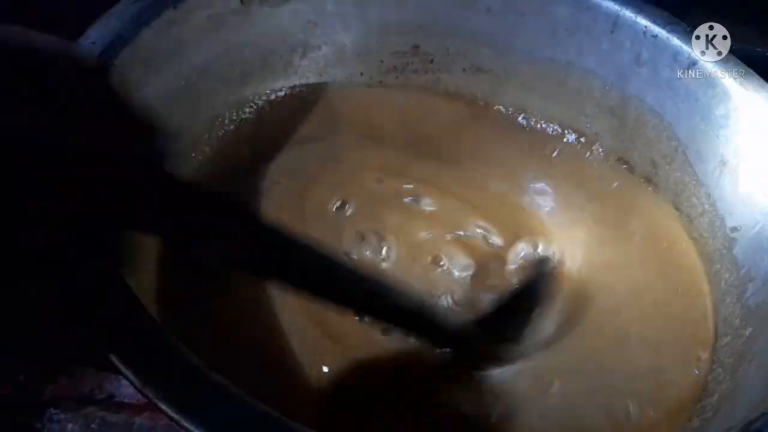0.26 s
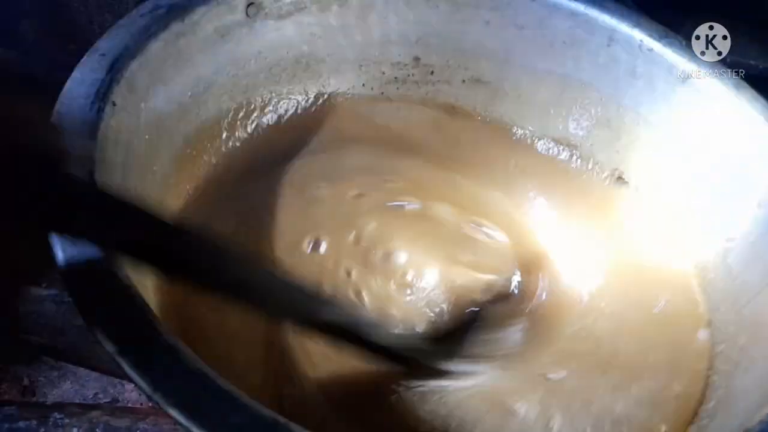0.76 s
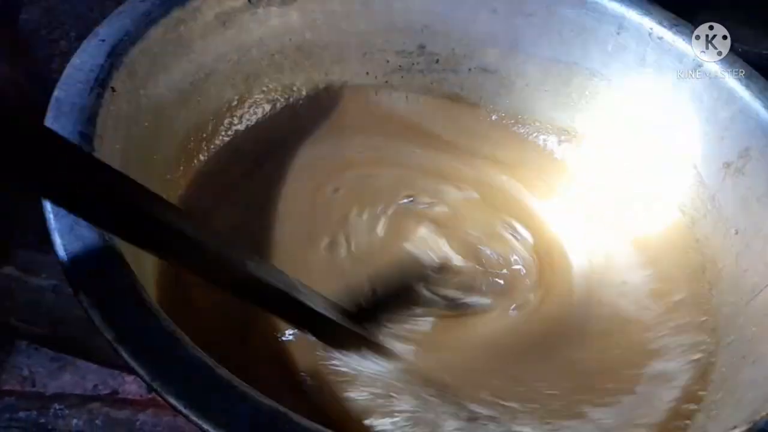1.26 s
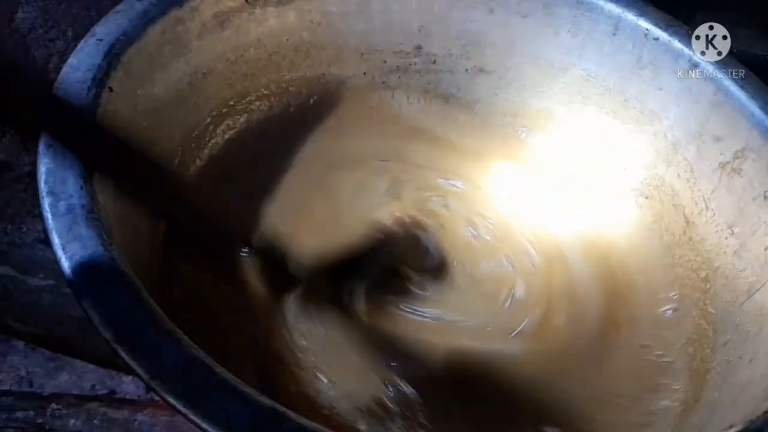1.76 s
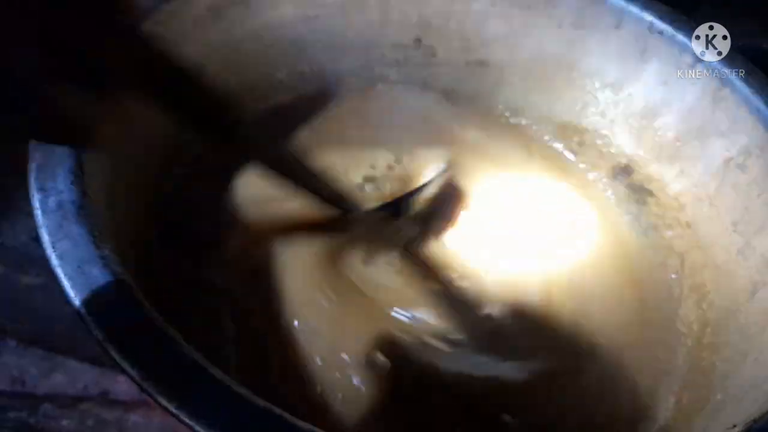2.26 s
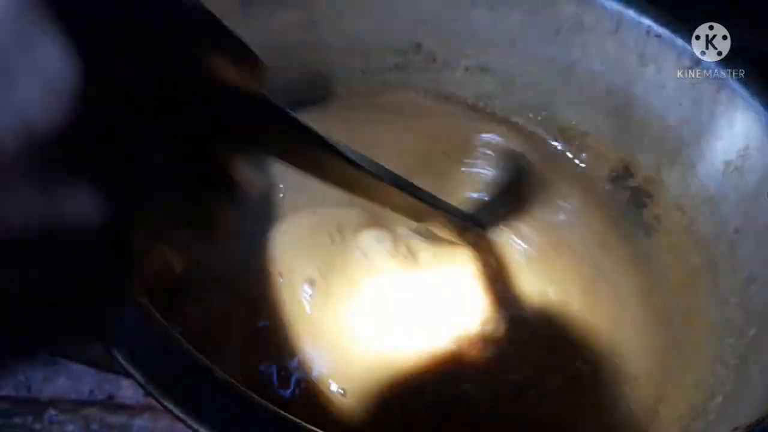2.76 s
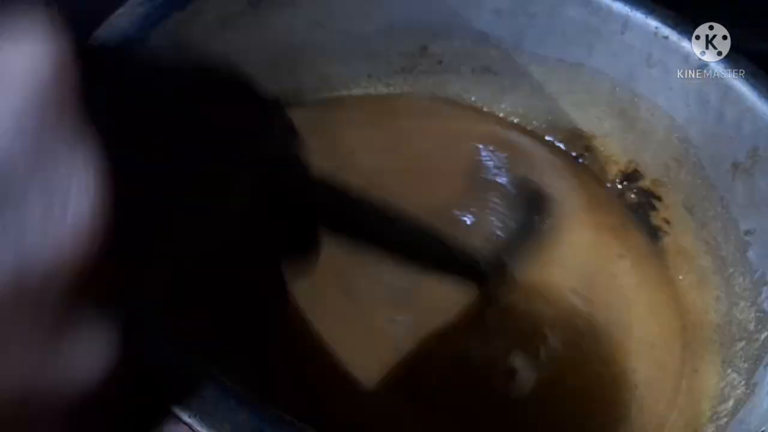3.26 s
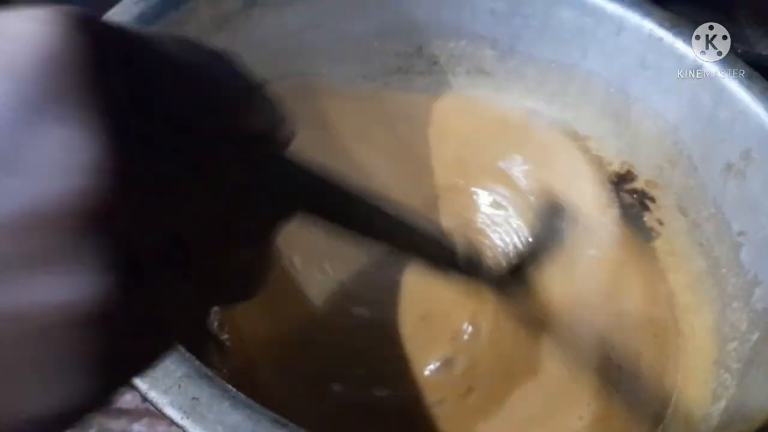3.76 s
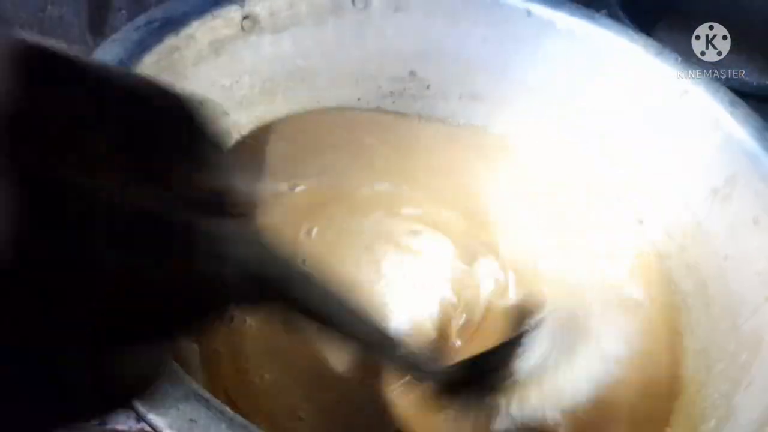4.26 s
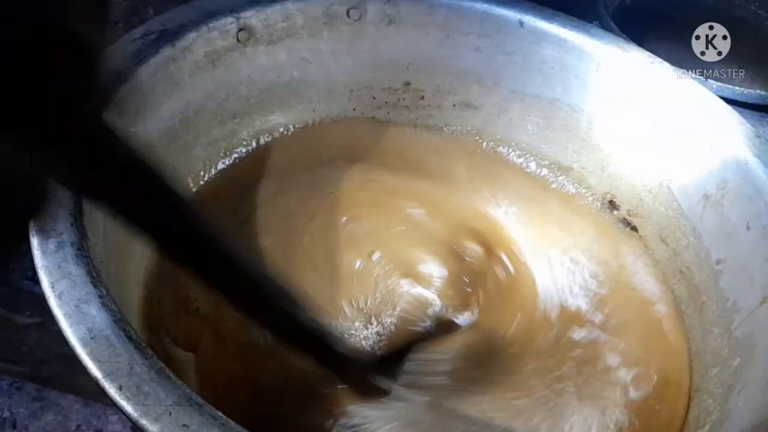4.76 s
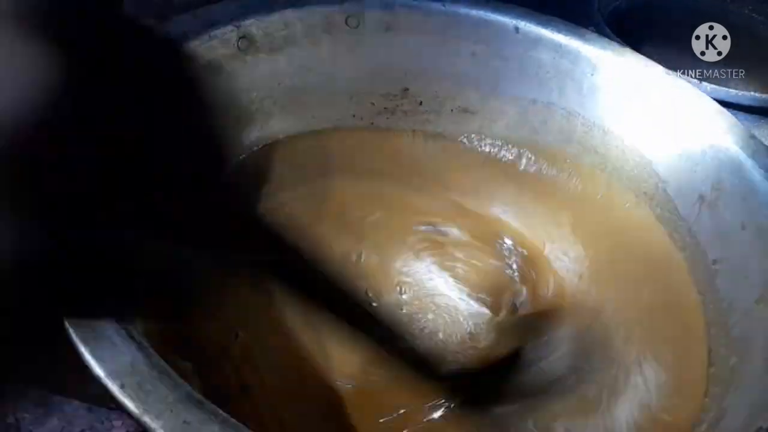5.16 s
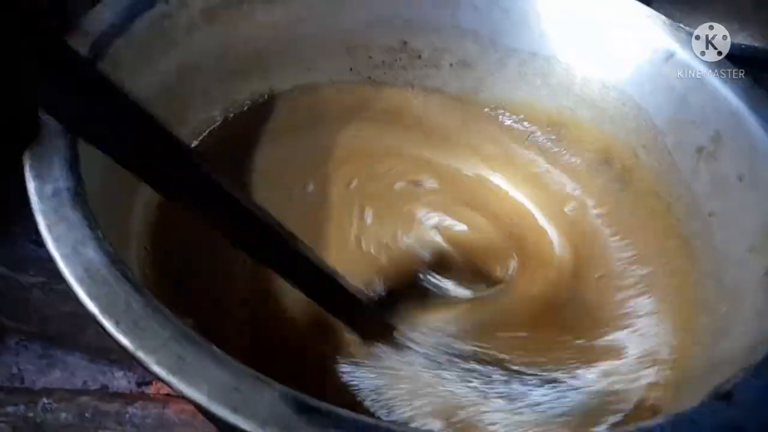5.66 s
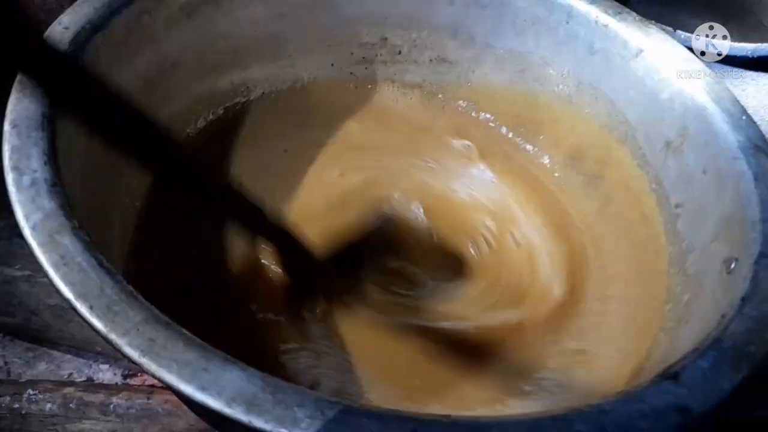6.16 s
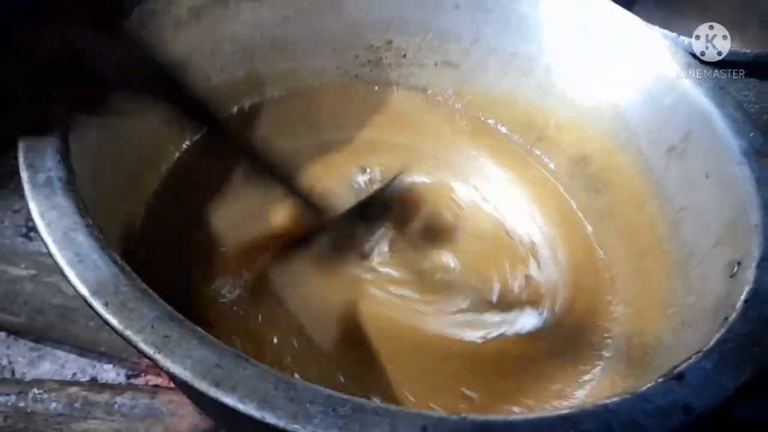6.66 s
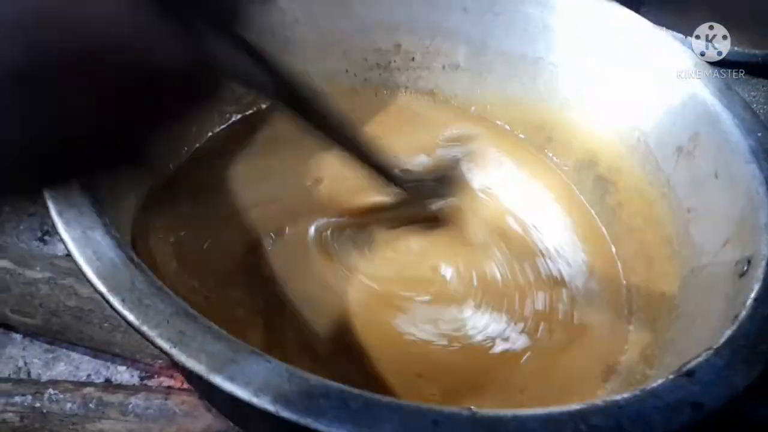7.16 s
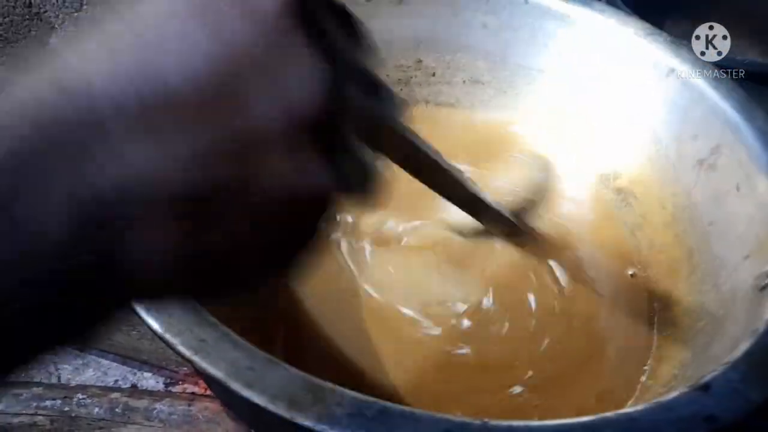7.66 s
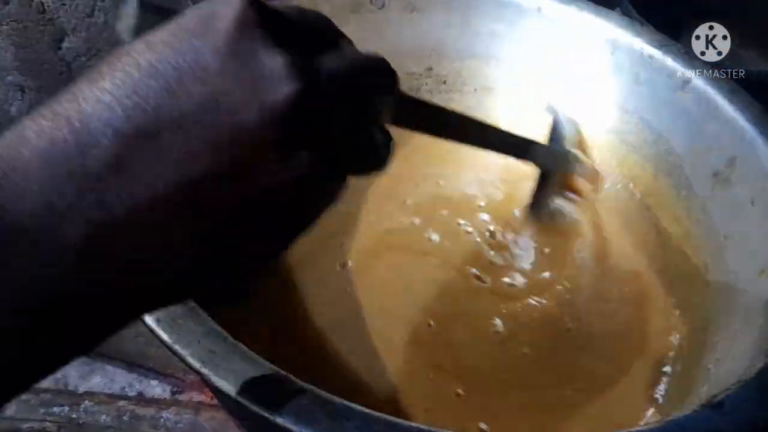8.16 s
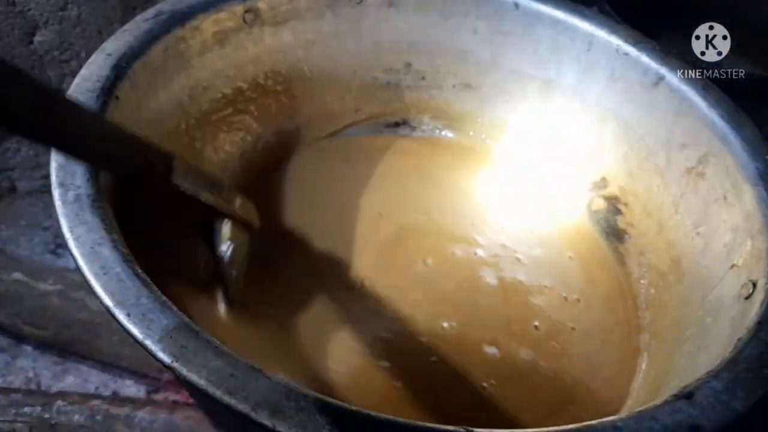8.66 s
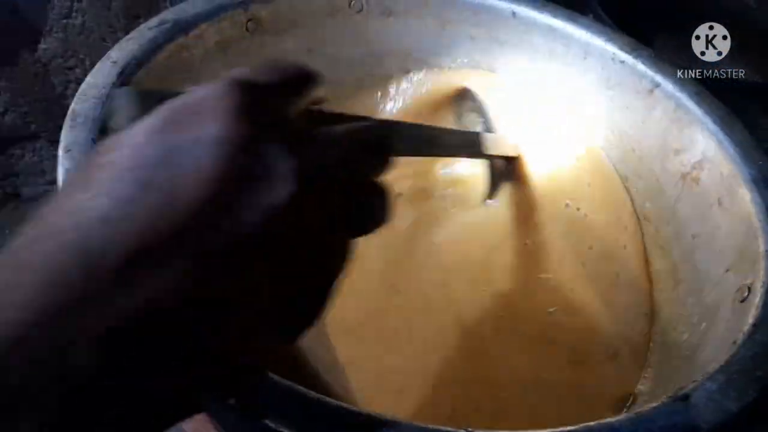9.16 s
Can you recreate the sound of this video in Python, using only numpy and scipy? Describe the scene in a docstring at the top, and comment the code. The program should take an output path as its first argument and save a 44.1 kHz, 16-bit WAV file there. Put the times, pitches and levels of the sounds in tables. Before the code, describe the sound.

A metal ladle sweeps round and round through thick bubbling syrup in a wide pot, scraping, sloshing and knocking, with a brief thin metal clatter.

```python
"""A metal ladle drags through thick syrup in a wide pot: scrapes, wet slosh and a low rumble over faint hiss.
Bubbles plop, short rasps and knocks break in, something small ticks, and a thin metal vessel clatters nearby.
The sweeps are gritty noise in shaped colours, bubbles are gliding tones, and the blows ring banks of dying modes.
Two ports of a phone just above the rim hear it, with a time lead on the left and separate echoes on each side."""
import sys
import numpy as np
from scipy import signal
from scipy.fft import rfft, irfft, next_fast_len
from scipy.io import wavfile
from scipy.ndimage import uniform_filter1d

SR = 44100
rng = np.random.default_rng(int(sys.argv[2]) if len(sys.argv) > 2 else 0)


def digitize_waveform(pressure):
    """Quantize a signal to 16-bit integers and store it at the path in sys.argv[1].

    Rows of a 2-D input are taken as channels; values are limited to [-1, 1].
    """
    field = np.atleast_2d(pressure).T
    bounded = np.clip(field, -1, 1)
    quanta = np.round(bounded * 32767).astype(np.int16)
    wavfile.write(sys.argv[1], SR, quanta)


N = 414981  # samples

# Colour of the faint hiss. Each row: frequency in Hz, relative gain in dB.
HISS_COLOUR = [(60, 8), (120, -58), (350, -0.5), (700, -26), (1500, -46), (2800, -25.5), (4500, -18),
               (7000, -30), (8200, -31), (13000, -20.5), (16000, -36)]
# Wavering high chirr bands. Each row: centre in Hz, width in Hz, level in dB.
CHIRR_BANDS = [(4050, 300, -73), (4850, 600, -69), (6850, 250, -66)]
# Longer spells of the chirring. Each row: start in seconds, length in seconds, from Hz, to Hz, level in dB.
CHIRR_SPELLS = [(7.19, 0.12, 3900, 4000, -56.5), (8.93, 0.16, 4570, 5100, -59),
                (9.26, 0.15, 5100, 4740, -58.5)]
# Sweeps of the ladle. Each row: start in seconds, length in seconds, scrape level in dB, slosh level in dB,
# delay until the pot rumbles in seconds, rumble level in dB.
LADLE_SWEEPS = [(0, 0.071, -50, -49, 0, -40.5), (0.218, 0.072, -59, -51, 0.032, -47),
                (0.407, 0.12, -47.5, -44.5, 0.013, -38), (0.64, 0.26, -52.5, -49.5, 0.043, -52.5),
                (0.866, 0.29, -48, -48, 0.066, -38.5), (1.307, 0.11, -49, -45.5, 0.031, -35),
                (1.619, 0.052, -54, -48.5, 0.09, -41), (1.737, 0.13, -47, -47, 0.1, -38),
                (2.033, 0.016, -51, -47.5, 0.043, -49.5), (2.219, 0.089, -46, -44, 0.0013, -40),
                (2.444, 0.09, -58.5, -54.5, 0, -53), (2.63, 0.049, -45.5, -45, 0.027, -36),
                (2.748, 0.061, -51.5, -47, 0.07, -41.5), (2.942, 0.21, -56, -60, 0, -52.5),
                (3.156, 0.047, -45, -49, 0.017, -43.5), (3.297, 0.045, -56.5, -55, 0.036, -52.5),
                (3.469, 0.23, -52.5, -49.5, 0.02, -46), (3.882, 0.36, -47.5, -49, 0.057, -43.5),
                (4.387, 0.23, -47.5, -47, 0.032, -42), (4.762, 0.18, -50.5, -45, 0.083, -39),
                (5.04, 0.059, -57.5, -58.5, 0.077, -44.5), (5.211, 0.22, -52.5, -52, 0.1, -45),
                (5.48, 0.29, -61.5, -58.5, 0, -54.5), (5.733, 0.19, -51, -48, 0.041, -42.5),
                (6.165, 0.21, -52.5, -48, 0.00092, -43.5), (6.606, 0.17, -50, -47.5, 0.029, -41),
                (7.074, 0.12, -48, -47.5, 0, -41.5), (7.482, 0.27, -53.5, -48.5, 0.0053, -43.5),
                (7.914, 0.2, -55, -54.5, 0, -45.5), (8.19, 0.17, -56.5, -49.5, 0.007, -50),
                (8.393, 0.057, -41.5, -40, 0.021, -51), (8.528, 0.074, -59, -51.5, 0.048, -46),
                (8.892, 0.23, -51.5, -47.5, 0.1, -36), (9.253, 0.13, -56, -45.5, .02, -67)]
# Colour of metal dragged on metal. Each row: frequency in Hz, relative gain in dB.
SCRAPE_COLOUR = [(470, -99), (800, -2.5), (1130, -4.5), (1250, -5.5), (1630, 6.5), (2350, -1.5),
                 (3300, -0.5), (6220, -0.5), (8530, -12.5), (14300, -10.5), (15900, -9), (16500, -72)]
# Resonances of the dragged ladle. Each row: centre in Hz, width in Hz, level against the scrape in dB.
LADLE_RESONANCES = [(837, 90, -11), (1263, 70, -12), (1980, 150, -12)]
# Colour of the moving syrup. Each row: frequency in Hz, relative gain in dB.
SLOSH_COLOUR = [(88, -5), (150, -18), (214, -0.5), (817, -8), (941, -12), (1230, -14.5), (1580, -10.5),
                (2500, -40), (3250, -20), (5500, -120)]
# Low resonances under the pot. Each row: centre in Hz, width in Hz, relative level in dB.
STAND_RESONANCES = [(46.6, 12.3, -4), (88, 11.3, -4.5), (118.9, 19.7, 2), (161.4, 17.4, -6)]
# Wet gurgles that rise as a hollow behind the ladle closes. Each row: start in seconds, length in seconds,
# from Hz, to Hz, level in dB.
HOLLOW_GURGLES = [(1.415, 0.046, 1327, 2850, -47), (2.255, 0.046, 1206, 1960, -46),
                  (5.77, 0.076, 990, 2200, -52)]
# Single bubbles that burst with a pitch. Each row: start in seconds, starting pitch in Hz, level in dB.
BUBBLE_PLOPS = [(.206, 470, -39), (.23, 476, -35.5), (.508, 416, -25.5), (1.308, 1830, -35),
                (1.428, 1500, -22), (2.95, 1580, -31), (4.542, 302, -30), (4.558, 307, -29),
                (4.801, 490, -38), (4.918, 473, -32.5), (7.561, 1880, -27.5)]
# Short rasps as the edge catches the bottom. Each row: start in seconds, level in dB before the band trims,
# treble against that level in dB, 60 dB fade time in seconds.
EDGE_RASPS = [(.328, -40, -5, 0.059), (0.552, -33.5, -20, 0.088), (.618, -23.5, -18, 0.16),
              (0.649, -27.5, -10.5, 0.042), (0.94, -25.5, -21, 0.074), (1.052, -28, -17, 0.11),
              (1.098, -17.5, -17.5, 0.069), (1.308, -31, -16.5, 0.25), (1.434, -33.5, -17.5, 0.3),
              (1.891, -30, -25, 0.073), (2.612, -31, -18, 0.36), (2.79, -23.5, -19, 0.12),
              (2.81, -20.5, -19, 0.044), (2.948, -38.5, -14, 0.096), (3.165, -23.5, -15, 0.053),
              (3.203, -24.5, -17, 0.055), (3.421, -41, -7, 0.071), (3.675, -33, -9.5, 0.047),
              (4.531, -27, -16, 0.034), (4.6194, -27.5, -16, 0.1), (4.848, -32, -22, 0.084),
              (4.991, -32.5, -16.5, 0.13), (5.181, -28.5, -8, 0.047), (5.3764, -29.5, -16, 0.067),
              (5.726, -36, -14.5, 0.3), (5.91, -19, -17.5, 0.029), (6.199, -33.5, -14, 0.17),
              (6.371, -31.5, -14, 0.037), (6.6166, -39, -17, 0.39), (6.803, -35, -15, 0.11),
              (6.9333, -28.5, -13, 0.071), (7.054, -37, -18, 0.38), (7.485, -35.5, -19, 0.12),
              (7.601, -34, -20, 0.039), (7.661, -23, -20, 0.074), (7.813, -27.5, -10.5, 0.042),
              (8.015, -25, -16, 0.17), (8.352, -30, -21, 0.29), (8.459, -30.5, -25, 0.083),
              (9.191, -34.5, -20, 0.083)]
# Blows of the ladle on the wall. Each row: start in seconds, thud level in dB, contact time in ms,
# ladle note in Hz, note against the thud in dB, note length in seconds before each partial shortens it.
WALL_KNOCKS = [(.619, -17, 0.62, 1320, -26, .1), (0.6533, -18.5, 0.89, 1243, -9.5, 0.15),
               (0.942, -14.5, 0.1, 970, -10, 0.64), (3.496, -27, 0.23, 1280, 3, 0.046),
               (6.4965, -26.5, 0.1, 552, 7.5, 0.058), (6.931, -23.5, 0.96, 1267, -19, 0.58),
               (7.662, -26, 0.64, 1287, -2.5, 0.35), (7.808, -22, 0.34, 1140, -16, 0.11),
               (8.013, -19, 0.83, 1120, -11, 0.049), (8.636, -27, 0.3, 1250, -9, 0.3),
               (8.84, -3.5, 0.77, 1234, -23, 0.26), (8.977, -23, 1, 1140, -48, .1),
               (9.191, -19.5, 1, 1230, -30, .1), (9.208, -19, 1, 1120, -13, 0.092),
               (9.336, -23, 0.33, 1260, -16.5, 0.35)]
# Body of the full pot. Each row: mode in Hz, relative level in dB, 60 dB decay in seconds.
POT_MODES = [(118, -10, .2), (168, -16, .15), (275, -11, .2), (345, -2, .07), (436, -4, .08),
             (520, -3, .06), (620, -8, .05), (764, -14, .12), (860, -15, .06), (1140, -24, .06),
             (1980, -26, .05)]
# Partials of the ladle's note. Each row: multiple of the note, relative level in dB.
LADLE_PARTIALS = [(1, 0), (.79, -7), (1.17, -15), (1.41, -10), (1.92, -14)]
# Ticks of a small hard thing. Each row: start in seconds, level in dB, pitch as a multiple of the tick modes,
# snap against the level in dB.
HARD_TICKS = [(1.76, -19.5, 0.88, -7.5), (4.0385, -10.5, 0.93, -15.5), (4.477, -5.5, 0.96, -21),
              (4.568, -29, 1.3, -7), (4.6874, -12, 0.95, -19), (5.3782, -17.5, 0.97, -6.5),
              (5.9724, -27, 0.93, -6), (6.178, -29, 0.74, -9), (6.2, -16, 0.99, -16)]
# Modes of the small hard thing. Each row: mode in Hz before the pitch multiple, relative level in dB,
# 60 dB decay in seconds.
TICK_MODES = [(2280, -7, .04), (4300, -4, .03), (4470, -1, .045), (4850, -4, .03), (5600, -4, .03),
              (10600, -10, .02), (12600, 0, .03), (13900, -4, .02)]
# Blows on the thin vessel. Each row: start in seconds, level in dB, contact time in ms,
# ring length as a multiple of a free blow, frequency in Hz near which it rings most.
VESSEL_BLOWS = [(3.888, -10.5, 0.2, 1.17, 2490), (3.975, -3.5, 0.055, 0.94, 2450),
                (4.039, -18.5, 0.57, 1.2, 2400), (4.1075, -11, 0.031, 1.36, 2865),
                (4.156, -16, 0.081, 0.66, 2280), (4.177, -13.5, 0.55, 1, 880),
                (4.234, -10.5, 0.11, 1.2, 2300), (4.275, -19.5, 0.82, 0.62, 720),
                (4.303, -21, 0.55, 2.2, 2290), (4.618, -23, 0.091, 0.41, 3600),
                (4.675, -12.5, 0.44, 1.07, 790), (4.689, -14, 0.28, 0.77, 2400),
                (6.498, -16.5, 0.3, 0.62, 1034), (6.528, -23.5, 0.6, 0.66, 1680)]
# Thin vessel struck freely. Each row: mode in Hz, relative level in dB, 60 dB decay in seconds.
VESSEL_MODES = [(603, -6, .18), (670, -3, .18), (715, -2, .18), (790, -6, .14), (860, -3, .3),
                (894, -5, .14), (963, -6, .25), (1034, -2, .33), (1255, -6, .3), (1500, -3, .18),
                (1680, -2, .16), (1825, -1, .22), (2090, -6, .14), (2250, -6, .22), (2356, -6, .35),
                (2424, -4, .38), (2478, -4, .12), (2865, -6, .33), (3327, -4, .27), (3580, -8, .12),
                (3803, -8, .1), (4054, -7, .16), (4215, -7, .16), (4460, -7, .16), (4670, -10, .16),
                (4980, -6, .13), (5197, -10, .1), (5360, -10, .1), (5520, -6, .14), (5755, -11, .1),
                (5945, -12, .1), (6260, -7, .07), (6900, -12, .08)]
# Balance of the two ports. Each row: frequency in Hz, left minus right in dB.
LEFT_BALANCE = [(60, -3.0), (110, -2.0), (200, -1.0), (380, -2.0), (700, -0.5), (1290, 0.0), (2380, -2.5),
                (4400, -4.0), (8120, 2.0), (15000, 1.5)]
# Echoes at the ports. Each row: frequency in Hz, echo against the direct sound in dB.
ECHO_SHARE = [(60, -13), (300, -11), (800, -6), (3000, -2), (8000, 1), (14000, -3)]


def undb(db):
    """Turn decibels into an amplitude factor."""
    return 10 ** (np.asarray(db) / 20)


def unit(x):
    """Scale to an rms of 1 over all rows together."""
    return x / np.sqrt(np.mean(x ** 2))


def noise():
    """Three unrelated rows: the direct sound and the echoes at the left and right port."""
    return rng.standard_normal((3, N))


def over_hz(table, size):
    """A (Hz, value) table read at every bin of a transform."""
    hz, value = np.transpose(table)
    bins_hz = np.arange(size // 2 + 1) * SR / size
    return np.interp(np.log(bins_hz + 1), np.log(hz), value)


def colour(x, table):
    """Shape the spectrum with a gain curve, then level it."""
    size = next_fast_len(N)
    return unit(irfft(rfft(x, size) * undb(over_hz(table, size)), size)[:, :N])


def band(x, lo_hz, hi_hz):
    """Keep one frequency band with gentle edges."""
    return signal.sosfilt(signal.butter(2, [lo_hz, hi_hz], "band", fs=SR, output="sos"), x)


def walk(rate):
    """Random levels held 1 / rate s and smoothed twice; spread near 1."""
    k = int(SR / rate)
    steps = np.repeat(rng.standard_normal(N // k + 1), k)
    return 1.23 * uniform_filter1d(uniform_filter1d(steps, k), k)[:N]


def resonances(x, table, sway_db=0, sway_rate=25):
    """Sum of levelled bands; each may sway in level on its own."""
    return sum(undb(db + sway_db * walk(sway_rate)) * unit(band(x, hz - width / 2, hz + width / 2))
               for hz, width, db in table)


def grit(rate, spread_db, smear_s):
    """Noise whose level jumps with random slips of unequal size, rate per second, and sinks back."""
    size_db = spread_db * np.minimum(rng.exponential(size=N), 2)
    slips = (rng.random(N) < rate / SR) * undb(size_db)
    keep = np.exp(-1 / (smear_s * SR))
    power = signal.lfilter([1], [1, -keep], slips ** 2) + 1
    return noise() * np.sqrt(power)


def add(out, s, y, onset_ms):
    """Mix a sound in at s seconds with a linear fade-in."""
    i = int(s * SR)
    onset = np.minimum(np.arange(y.shape[-1]) / (SR * onset_ms / 1000), 1)
    out[..., i:i + y.shape[-1]] += (y * onset)[..., :N - i]


def fade(t60):
    """Exponential decay by 60 dB in t60 s, cut at a third of a second."""
    return 1000. ** (-np.arange(SR // 3) / SR / t60)


def swells(start, length, db, rise_db_per_s, fall_db_per_s):
    """Each swell climbs to its level, holds it and sinks again; overlapping swells add in power."""
    t = np.arange(0, N + 64, 64) / SR  # coarse time grid
    start, length, db = start[:, None], np.maximum(length, 0)[:, None], db[:, None]
    before, after = np.maximum(start - t, 0), np.maximum(t - start - length, 0)
    under_db = rise_db_per_s * before + fall_db_per_s * after
    gain = np.sqrt(np.sum(undb(db - under_db) ** 2, axis=0))
    return np.interp(np.arange(N) / SR, t, gain)


def glides(rows, width_hz):
    """Narrow noise whose centre slides from one pitch to another under a soft swell."""
    out = np.zeros((3, N))
    wobble = signal.sosfilt(signal.butter(2, width_hz / 2, fs=SR, output="sos"), noise())
    for s, length, from_hz, to_hz, db in rows:
        u = np.linspace(0, 1, int(length * SR))
        phase = 2 * np.pi * np.cumsum(from_hz * (to_hz / from_hz) ** u) / SR
        swell = 2 * np.abs(np.sin(np.pi * u))
        add(out, s, undb(db) * swell * np.sin(phase), onset_ms=1)
    return out * unit(wobble)


def bubble(hz, turns, glide, span, left, right):
    """A dying tone that glides up; each echo row starts at its own phase."""
    u = np.arange(int(span * turns * SR / hz)) * hz / SR  # cycles at the starting pitch
    phase = 2 * np.pi * (u * (1 + glide * u / turns) + np.array([[0], [left], [right]]))
    return np.exp(-2 * u / turns) * np.sin(phase)


def flecks(count, lo_hz, hi_hz, cycles, glide, spread_db):
    """Many small bubbles of chance pitch, length and size, gliding up as they die."""
    out = np.zeros((3, N))
    for when, pitch, length, size, left, right in rng.random((count, 6)):
        hz = lo_hz * (hi_hz / lo_hz) ** pitch
        turns = cycles * (0.7 + 1.96 * length)
        gain = undb(-spread_db * np.log(size + .05))
        add(out, when * N / SR, gain * bubble(hz, turns, glide, 3, left, right), onset_ms=1.5)
    return unit(out)


def ring(modes, contact_ms, scatter_db, split_hz=0):
    """One blow, direct peak 1: modes get chance shares; a longer contact dulls the high ones; split modes beat."""
    hz, db, t60 = np.transpose(modes)[:, :, None]
    t = np.arange(int(SR * min(t60.max(), 1 / 4))) / SR
    chance = rng.standard_normal((4, len(modes), 1))
    gain = undb(db + scatter_db * chance[0]) / (1 + (hz * contact_ms / 1000) ** 2)
    detuned_hz = hz * (1 + 0.0032 * chance[1])
    swing = gain * np.exp((2j * np.pi * detuned_hz - np.log(1000) / t60) * t)
    beat_a = .45 * np.cos(2 * np.pi * split_hz * chance[2] * t)
    beat_b = .35 * np.sin(2 * np.pi * split_hz * chance[3] * t)
    swing = swing * (1 + beat_a + beat_b)
    # echoes carry each mode with another phase
    turn = np.exp(2j * np.pi * rng.random((3, len(modes))) * [[0], [1], [1]])
    y = (turn @ swing).imag
    return y / np.abs(y[0]).max()


def background():
    """A faint hiss that breathes, and a few narrow high bands that waver, with gliding spells of chirr."""
    hiss = colour(noise(), HISS_COLOUR) * undb(-52 + 2.9 * walk(3.17))
    chirr = resonances(noise(), CHIRR_BANDS, sway_db=2.5, sway_rate=6)
    return hiss + chirr + glides(CHIRR_SPELLS, width_hz=490)


def stirring():
    """Metal drags on metal under syrup: gritty scrape, lumpy slosh with bubbles, and the stand shaken into a rumble."""
    start, length, scrape_db, slosh_db, delay, rumble_db = np.transpose(LADLE_SWEEPS)
    scrape_gain = swells(start, length, scrape_db, rise_db_per_s=263, fall_db_per_s=132)
    slosh_gain = swells(start, length, slosh_db, rise_db_per_s=263, fall_db_per_s=132)
    linger_s = 0.001  # rumble holds on past the sweep
    rumble_gain = swells(start + delay, length - delay + linger_s, rumble_db, rise_db_per_s=193, fall_db_per_s=125)

    scrape = colour(grit(rate=99, spread_db=6.0, smear_s=0.013), SCRAPE_COLOUR) * undb(3.04 * walk(25))
    scrape = (scrape + resonances(noise(), LADLE_RESONANCES, sway_db=4)) * scrape_gain

    slosh = colour(grit(rate=60, spread_db=6.0, smear_s=0.0041), SLOSH_COLOUR) * undb(3 * walk(30))
    bubbles = flecks(count=900, lo_hz=250, hi_hz=1700, cycles=5, glide=.06, spread_db=3)
    slosh = (slosh + undb(-5) * bubbles) * slosh_gain

    shake = grit(rate=23, spread_db=7.5, smear_s=0.0091)
    rumble = unit(resonances(shake, STAND_RESONANCES)) * rumble_gain
    return scrape + slosh + rumble + glides(HOLLOW_GURGLES, width_hz=230)


def plops():
    """A short dying tone that glides up as the bubble opens; big low bubbles ring fewer cycles."""
    out = np.zeros((3, N))
    for s, hz, db in BUBBLE_PLOPS:
        left, right = rng.random(2)
        turns = 9.5 * np.sqrt(hz / 1000)
        add(out, s, undb(db) * bubble(hz, turns, 0.063, 4, left, right), onset_ms=0.96)
    return out


def rasps():
    """Bursts of the scrape colour with a quick rise; the treble share depends on how the edge bites."""
    mids, highs = np.zeros(N), np.zeros(N)
    for s, db, treble_db, t60 in EDGE_RASPS:
        add(mids, s, undb(db) * fade(t60), onset_ms=1.6)
        add(highs, s, undb(db + treble_db) * fade(t60), onset_ms=0.47)
    bite = grit(rate=170, spread_db=5.5, smear_s=0.0048)
    grain = colour(bite, SCRAPE_COLOUR) + resonances(bite, LADLE_RESONANCES)
    body = 0.5 * mids * unit(band(grain, 450, 5500))
    treble = 0.95 * highs * unit(band(grain, 11550, 12740))
    return body + treble


def knocks():
    """The pot thuds with a wet, noisy tail; the ladle adds one note that depends on where it is held and struck."""
    out, tail = np.zeros((3, N)), np.zeros(N)
    for s, db, contact_ms, note_hz, note_db, t60 in WALL_KNOCKS:
        add(out, s, undb(db) * ring(POT_MODES, contact_ms, scatter_db=2.5), onset_ms=1.5)
        # every partial dies sooner than the note length, most of all those far from the note
        note = [(note_hz * k, k_db, t60 / max(k, 1.23 / k) ** 2) for k, k_db in LADLE_PARTIALS]
        add(out, s, undb(db + note_db) * ring(note, 0, scatter_db=0, split_hz=7.7), onset_ms=0.57)
        add(tail, s, undb(db - 12.5) * fade(0.049), onset_ms=0.93)
    return out + tail * unit(band(noise(), 186, 580))


def ticks():
    """Tiny hard contacts: a few short modes in a dry, broad snap."""
    out, snap = np.zeros((3, N)), np.zeros(N)
    for s, db, pitch, snap_db in HARD_TICKS:
        modes = TICK_MODES * np.array([pitch, 1, 1])
        add(out, s, undb(db) * ring(modes, 0, scatter_db=2, split_hz=70), onset_ms=2.0)
        add(snap, s, undb(db + snap_db) * fade(0.033), onset_ms=2.0)
    air = noise()
    low = undb(-17) * unit(band(air, 1900, 3700))
    middle = unit(band(air, 4400, 5620))
    high = undb(-10) * unit(band(air, 11800, 16800))
    return out + snap * unit(low + middle + high)


def clangs():
    """Modes ring on above a noisy crash and a bright crack; where the blow lands favours some modes."""
    out, crash, crack = np.zeros((3, N)), np.zeros(N), np.zeros(N)
    hz, mode_db, t60 = np.transpose(VESSEL_MODES)
    favour_db, favour_octaves = 4, .05  # lift near the favoured frequency, and its width
    for s, db, contact_ms, free, near_hz in VESSEL_BLOWS:
        lift_db = favour_db * np.exp(-(np.log2(hz / near_hz) / favour_octaves) ** 2)
        modes = np.transpose([hz, mode_db + lift_db, t60 * free])
        add(out, s, undb(db) * ring(modes, contact_ms, scatter_db=2.5, split_hz=22), onset_ms=1.6)
        add(crash, s, undb(db - 26) * (fade(0.2) + 0.36 * fade(0.14)), onset_ms=1.1)
        # a longer contact softens the crack
        add(crack, s, undb(db - 20) / (1 + 3 * contact_ms) * fade(0.052), onset_ms=0.47)
    air = noise()
    edge = unit(band(band(air, 6100, 7200), 6100, 7200)) + undb(-11) * unit(band(air, 10000, 12400))
    clatter = unit(band(band(air, 420, 4400), 420, 4400))
    return out + crack * edge + crash * clatter


def ports(x, lead_s, wrap_hz):
    """Direct sound reaches the left port first, less so in the bass that wraps round the phone; echoes differ by side."""
    size = next_fast_len(N + 1024)
    hz = np.arange(size // 2 + 1) * SR / size
    lead = 2 * np.pi * hz * lead_s * hz ** 3 / (hz ** 3 + wrap_hz ** 3)  # radians
    side = np.array([[.5], [-.5]])  # left, right
    share = undb(over_hz(ECHO_SHARE, size))
    spectrum = rfft(x, size)
    direct = spectrum[0] * np.exp(1j * side * lead)
    both = (direct + share * spectrum[1:]) / np.sqrt(1 + share ** 2)
    return irfft(both * undb(side * over_hz(LEFT_BALANCE, size)), size)[:, :N]


def scene():
    """The pot with its background, and the thin vessel, each with its own lead between the ports."""
    pot = background() + stirring() + plops() + rasps() + knocks() + ticks()
    return ports(pot, lead_s=.00045, wrap_hz=1350) + ports(clangs(), lead_s=.0004, wrap_hz=750)


def record(dry):
    """The phone cuts the deepest bass below 44 Hz and the top above 15.9 kHz."""
    low_cut = signal.butter(8, 44, "high", fs=SR, output="sos")
    top_cut = signal.ellip(8, .2, 70, 15900, fs=SR, output="sos")
    return signal.sosfilt(top_cut, signal.sosfilt(low_cut, dry))


dry = scene()
out = record(dry)
digitize_waveform(out)
```